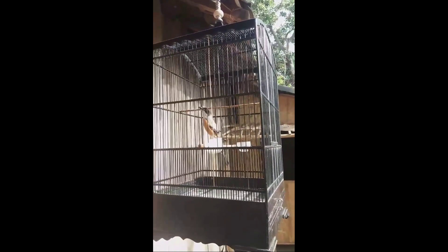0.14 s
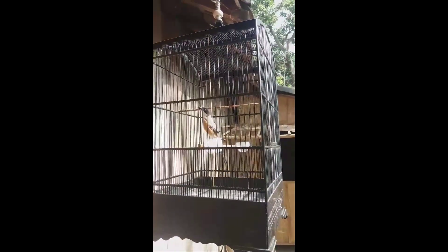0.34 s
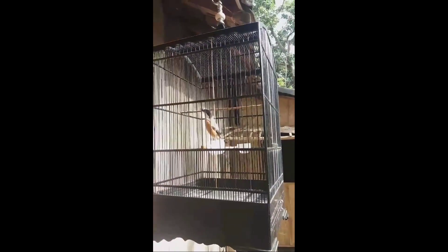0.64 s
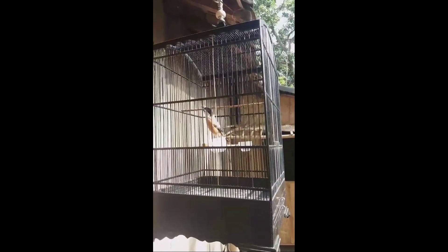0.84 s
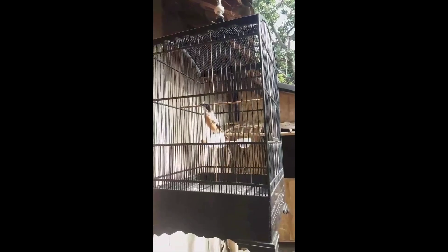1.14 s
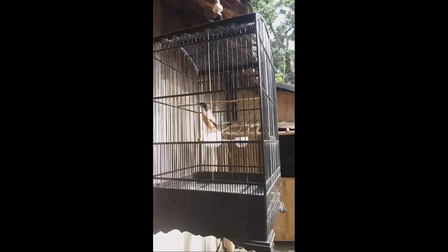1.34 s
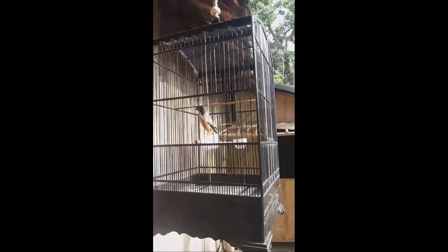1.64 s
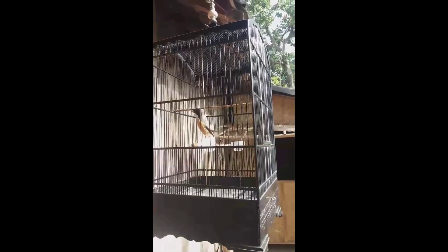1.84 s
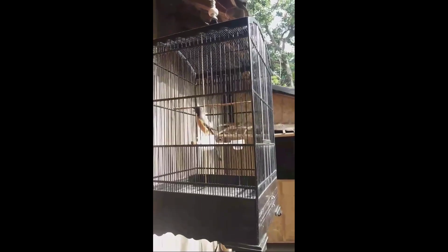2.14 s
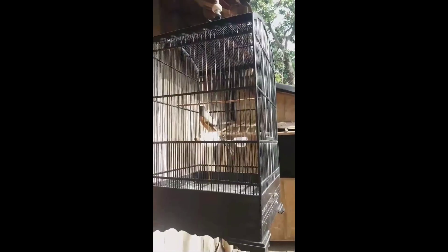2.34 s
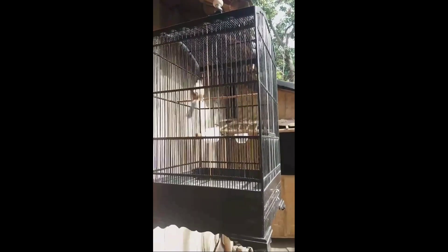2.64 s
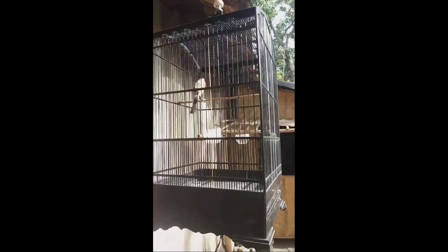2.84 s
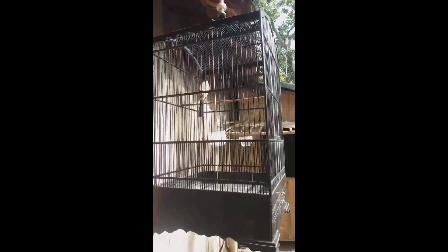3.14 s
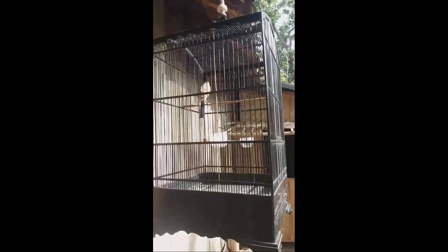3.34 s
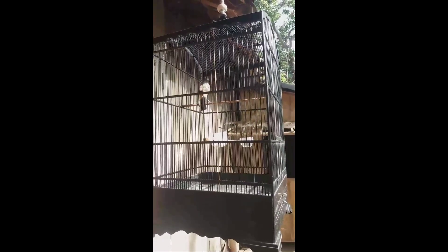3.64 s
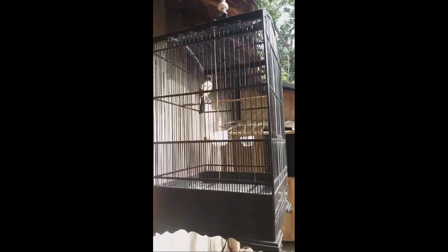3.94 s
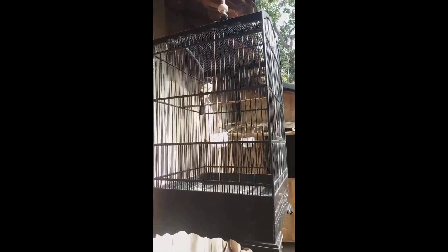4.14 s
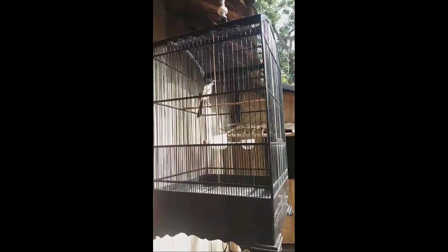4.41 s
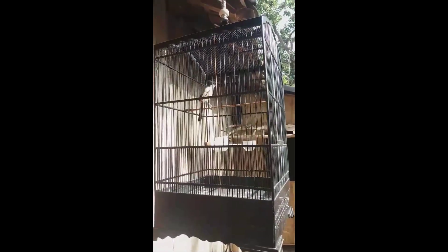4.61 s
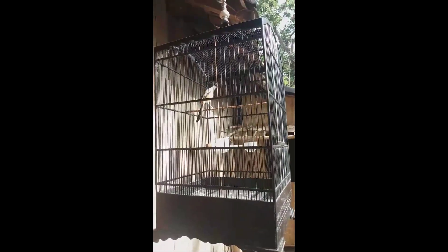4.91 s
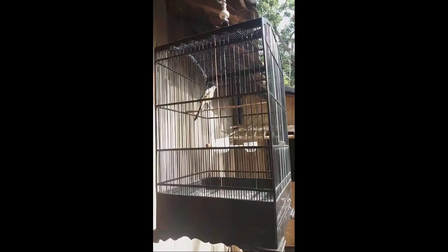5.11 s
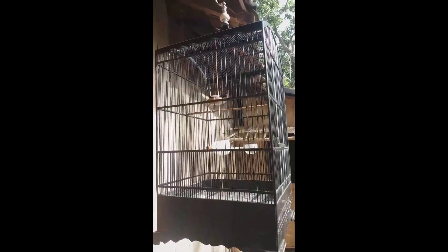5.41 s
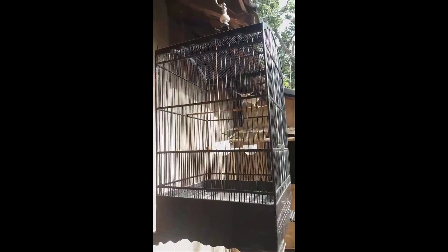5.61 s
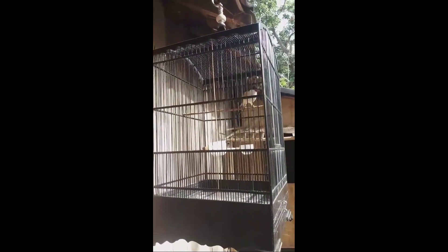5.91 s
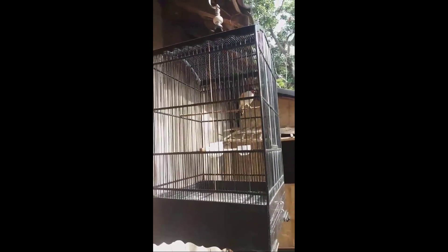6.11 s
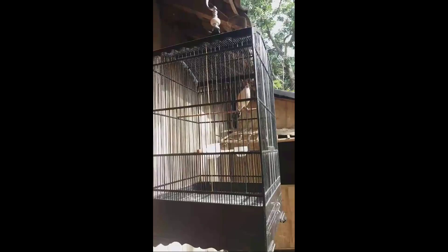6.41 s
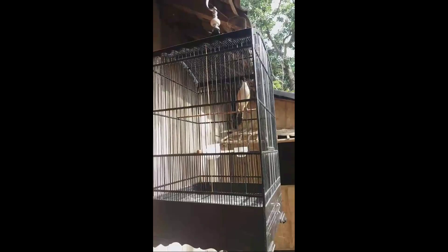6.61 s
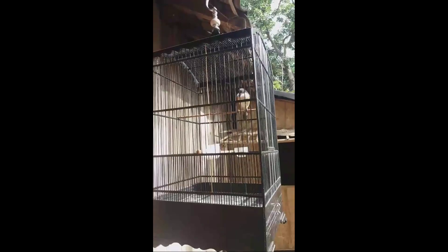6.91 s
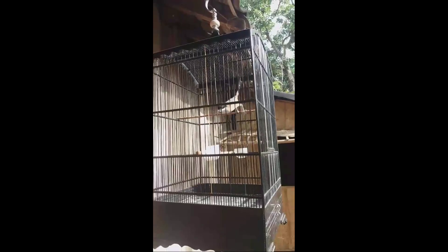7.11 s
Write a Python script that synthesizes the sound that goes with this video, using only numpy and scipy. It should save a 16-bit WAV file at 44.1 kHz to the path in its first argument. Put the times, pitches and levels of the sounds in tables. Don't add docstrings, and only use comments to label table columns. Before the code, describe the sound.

A caged bird calls loudly and close under a porch roof. Four separate harsh rasps come first, then eight evenly spaced, bright two-part chirps. Two short rasps tip into a long, rapid, hoarse chatter that gradually softens, ending in a quick sweep and three whistles that snap upward. Short yard echoes follow each call. Low traffic rumble, faint engines, a far rooster and small perch thuds lie behind, heard on a phone with slightly grainy treble.

```python
import sys
import numpy as np
from scipy import signal
from scipy.fft import rfft, irfft, next_fast_len
from scipy.io import wavfile
from scipy.ndimage import uniform_filter1d, map_coordinates

SR = 44100
rng = np.random.default_rng(int(sys.argv[2]) if len(sys.argv) > 2 else 0)


def bounce(signal):
    frames = np.transpose(np.atleast_2d(signal))
    limited = np.clip(frames, -1, 1)
    pcm = np.round(limited * 32767).astype(np.int16)
    wavfile.write(sys.argv[1], SR, pcm)


def boost(x):
    u = np.asarray(x, float) / 20
    return 10 ** u


N = 320166

# frequency in Hz, level in dB per Hz.
BEAK_OPEN = [(530, -69), (900, -27.5), (1260, -26), (1420, -23.5), (2000, -22), (2890, -8), (4100, 1.5),
             (6120, -16.5), (8150, -22), (8650, -39.5), (9510, -25), (11900, -20.5), (15500, -75)]
# frequency in Hz, gain in dB.
WINDPIPE = [(900, -27.5), (1400, -8), (1900, -1), (20000, 2.5)]
# frequency in Hz, level in dB per Hz.
CHATTER_HISS = [(530, -53.5), (900, -29), (1380, -20), (1840, -9), (2310, -24), (3630, 2.5), (4080, -16),
                (5440, -4.5), (7860, -17), (12800, -12), (15500, -21)]
# start in seconds, level in dB, pitch in Hz, halfway lines in dB.
HOARSE_NOTES = [
    (3.756, -17.5, 1966, -20),
    (3.809, -22, 1658, -6),
    (3.859, -20.5, 1737, -10),
    (3.918, -19.5, 1835, -16.5),
]


def unit(x):
    return x / np.sqrt(np.mean(x ** 2) + 1e-20)


def along(points, hz):
    f, v = np.transpose(points)
    return np.interp(np.log(hz + 1), np.log(f + 1), v)


def wobble(n, rate):
    knots = rng.standard_normal(int(n * rate / SR) + 4)
    return map_coordinates(knots, [np.arange(n) * rate / SR])


def coloured(x, spectrum):
    cep = irfft(np.log(boost(along(spectrum, np.fft.rfftfreq(2048, 1 / SR))) + 1e-6))
    cep[1:1024] *= 2
    cep[1025:] = 0
    kernel = irfft(np.exp(rfft(cep)))
    return signal.fftconvolve(x, kernel / np.linalg.norm(kernel))[:len(x)]


def note(rows):
    s, *cols = np.transpose(rows)
    t = np.arange(s[0], s[-1], 1 / SR)
    u = (t - s[0]) / (s[-1] - s[0])
    gate = np.clip(np.minimum(t - s[0], s[-1] - t) / 0.00098, 0, 1)
    return round(s[0] * SR), u, gate, [np.interp(t, s, c) for c in cols]


def add(track, at, x):
    track[at:at + len(x)] += x[:len(track) - at]


def partials(hz, levels, jitter, flutter_db, flutter_rate):
    n = len(hz)
    phase = 2 * np.pi * np.cumsum(hz * (1 + jitter * wobble(n, 497.7))) / SR
    out = np.zeros(n)
    for k, db in levels:
        flutter = flutter_db * np.clip(wobble(n, flutter_rate), -3, 1.4)
        out += np.sqrt(2) * boost(db + flutter) * np.sin(k * phase + rng.uniform(0, 6.6))
    return out


def slaps(n, rate, hiss):
    cycles = np.cumsum(rate * boost(2 * wobble(n, 300))) / SR
    when = np.diff(np.floor(cycles), prepend=0)
    sizes = boost(2.5 * rng.standard_normal(n))
    return unit(unit(when * sizes) + hiss * rng.standard_normal(n))


def yard():
    # time in seconds, rumble level in dB.
    traffic_swell = [(0.0, -57), (0.32, -56), (3.499, -50.5), (3.54, -57.5), (4.2, -51), (4.25, -54),
                     (4.55, -44.5), (4.65, -51), (7.26, -53.5)]
    # frequency in Hz, level in dB per Hz.
    rumble_colour = [(12, -30), (20, -20.5), (27, -38), (57, -0.5), (107, 2.5), (126, 2), (156, -7),
                     (196, -9.5), (400, -27.5), (520, -67), (880, -120)]
    hush_colour = [(120, -45), (200, -2), (488, -4.5), (728, -2), (1050, -5.5), (1650, -4.5), (2130, -9),
                   (4500, -15), (7900, -26.5), (14200, -18), (15500, -45.5)]
    hz = np.fft.rfftfreq(N, 1 / SR)
    noise = rfft(rng.standard_normal((2, N)))
    road = unit(irfft(noise[0] * boost(along(rumble_colour, hz)), N))
    hush = unit(irfft(noise[1] * boost(along(hush_colour, hz)), N))
    s, db = np.transpose(traffic_swell)
    traffic_db = np.interp(np.arange(N) / SR, s, db)
    road_level = boost(traffic_db + 1.4 * wobble(N, 3.83))
    hush_level = boost(0.31 * traffic_db - 39 + 0.37 * wobble(N, 0.92))
    return road_level * road + hush_level * hush


def passers():
    # closest moment in seconds, half width in seconds, level in dB, centre in Hz.
    engines = [
        (3.15, 0.24, -55.5, 1360),
        (4.15, 0.32, -57, 766),
    ]
    hz, t = np.fft.rfftfreq(N, 1 / SR), np.arange(N) / SR
    out = np.zeros(N)
    for s, wide, db, centre_hz in engines:
        band = np.exp(-(np.log((hz + 1) / centre_hz) / 0.45) ** 2)
        haze = unit(irfft(rfft(rng.standard_normal(N)) * band, N))
        out += boost(db + 2.1 * wobble(N, 26.0)) * np.exp(-((t - s) / wide) ** 2) * haze
    return out


def roosters():
    # start in seconds, length in seconds, pitch in Hz, first and second partial in dB.
    syllables = [(.2, 0.2, 867, -56, -70), (.33, 0.34, 844, -66, -51.5), (0.984, 0.23, 959, -54.5, -76),
                 (1.12, 0.18, 740, -71, -51.5), (1.327, 0.69, 811, -55, -51),
                 (2.122, 0.19, 803, -73.5, -44.5)]
    last_syllables = [
        (2.112, 0.2, 689, -64, -43.5),
        (3.079, 0.16, 732, -80, -52),
    ]
    attack_s, release_s, edge_db = 0.027, 0.1, -11.5
    crows = [(row, 0.11) for row in syllables] + [(row, 0.45) for row in last_syllables]
    out = np.zeros(N)
    for (s, life, hz, one, two), sag in crows:
        release_at = max(life - release_s, attack_s)
        shape = [(0, edge_db), (attack_s, 0), (release_at, 0), (life, edge_db)]
        at, u, gate, (db,) = note([(s + late, soft) for late, soft in shape])
        pitch = hz * (1 - sag * life * u)
        levels = [(1, one + db), (2, two + db)]
        add(out, at, gate * partials(pitch, levels, jitter=.02, flutter_db=3.5, flutter_rate=45.))
    return out


def perch():
    # time in seconds, peak in dB, lowest mode in Hz.
    hops = [
        (1.841, -35, 60.4),
        (4.521, -42, 90),
        (5.789, -37, 329.3),
        (7.169, -32.5, 340),
    ]
    out, t = np.zeros(N), np.arange(3000) / SR
    for s, db, hz in hops:
        ring = sum(share * np.sin(2 * np.pi * ratio * hz * t) for ratio, share in [(1, 1), (2.47, .51), (1.59, .5)])
        add(out, round(s * SR), boost(db - 60 * t / 0.03) * (1 - np.exp(-t / 0.00223)) * ring)
    return out


def walls(x, count):
    # frequency in Hz, 60 dB decay time in seconds.
    decay_times = [(1000, 0.84), (2300, 0.25), (3400, 0.3), (4400, 0.3), (5600, 0.38), (7000, 0.35),
                   (12000, 0.22)]
    hz, t, z = signal.stft(rng.standard_normal((count, int(.7 * SR))), SR, nperseg=256)
    z *= boost(2.7 * np.exp(-((hz[:, None] - 4350) / 450) ** 2))
    tails = signal.istft(z * boost(-60 * t / along(decay_times, hz)[:, None]), SR, nperseg=256)[1]
    tails[:, :900] *= 1 + 0.5 * np.linspace(1, 0, 900)
    lumps = boost(5 * wobble(tails.size, 120))
    tails *= lumps.reshape(tails.shape)
    turn = np.arange(N) / SR / 0.28 % count
    away = np.abs((turn - np.arange(count)[:, None] + count / 2) % count - count / 2)
    share = np.clip(1 - away, 0, 1)
    tails = tails / np.linalg.norm(tails, axis=1, keepdims=True)
    wet = signal.fftconvolve(x * share, tails, axes=1)
    return np.pad(wet.sum(0), (130, 0))[:N]


def rasps():
    # start in seconds, length in seconds, peak in dB.
    harsh_calls = [
        (.082, 0.11, -14),
        (.63, 0.1006, -11.5),
        (1.04, 0.09, -12.5),
        (1.409, 0.1, -12.5),
        (3.736, 0.069, -16.5),
        (3.8, 0.069, -23),
    ]
    # share of the length, level in dB.
    call_swell = [(0, -34), (.2, -8.5), (.55, -2), (.85, -7.5), (1, -20.5)]
    # start in Hz, top in Hz, share of the length climbing, level in dB.
    hoarse_cores = [
        (2500, 4350, .8, -5.5),
        (2500, 4300, .85, -7.5),
        (2670, 3400, 0.5, -7.5),
        (2387, 4200, 0.55, -8.5),
    ]
    # frequency in Hz, level in dB per Hz.
    beak_shut = [(530, -87), (900, -44.5), (1290, -32), (1420, -17.5), (1540, -20), (1820, -12),
                 (2200, -9.5), (3540, -4.5), (4390, -22.5), (7230, -45), (8650, -53.5), (11400, -48.5),
                 (15500, -40.5)]
    shut, wide, core = np.zeros((3, N))
    for k, (s, life, peak_db) in enumerate(harsh_calls):
        at, u, gate, (db,) = note([(s + share * life, peak_db + soft) for share, soft in call_swell])
        alone = s < HOARSE_NOTES[0][0] - life
        x = gate * boost(db - 3 - 1 * (not alone)) * slaps(len(u), rate=600., hiss=1.1)
        opening = np.clip(1.04 * u - .1, 0, 1) if alone else 0.51 + 0 * u
        add(shut, at, x * np.cos(np.pi / 2 * opening))
        add(wide, at, x * np.sin(np.pi / 2 * opening))
        if alone:
            low, top, climb, core_db = hoarse_cores[k]
            hz = low + (top - low) * np.sin(np.pi / 2 * np.clip(u / climb, 0, 1))
            levels = [(1, db + core_db)]
            add(core, at, gate * partials(hz, levels, jitter=0.0816, flutter_db=1.5, flutter_rate=430.0))
    return coloured(shut, beak_shut) + coloured(wide, BEAK_OPEN) + core


def leads():
    # time in seconds, pitch in Hz, level in dB.
    lead_paths = [
        [(1.633, 3380, -38), (1.638, 3896, -40.5), (1.643, 3512, -19.5), (1.652, 3650, -22), (1.659, 3291, -21),
         (1.664, 2577, -24.5), (1.673, 2450, -23.5)],
        [(1.847, 3346, -43), (1.856, 3808, -24), (1.860, 3620, -17.5), (1.869, 3370, -20), (1.875, 2703, -23),
         (1.883, 2390, -18.5)],
        [(2.084, 3310, -43), (2.094, 3866, -41), (2.096, 3510, -20.5), (2.103, 3400, -16), (2.108, 2750, -22),
         (2.12, 2470, -16)],
        [(2.353, 1990, -39.5), (2.36, 2850, -21), (2.365, 3160, -14.5), (2.371, 2655, -21), (2.378, 2685, -15),
         (2.389, 2390, -29)],
        [(2.574, 2580, -32.5), (2.581, 3400, -16.5), (2.59, 3330, -22), (2.596, 2800, -20), (2.605, 2430, -27)],
        [(2.805, 2587, -34), (2.81, 2883, -30.5), (2.812, 3520, -20), (2.82, 3200, -16.5), (2.828, 2769, -20.5),
         (2.839, 2584, -27.5)],
        [(3.03, 3890, -42.5), (3.04, 3809, -20), (3.047, 3480, -22), (3.053, 2930, -26), (3.06, 2500, -27)],
        [(3.288, 2090, -34.5), (3.293, 3030, -21), (3.297, 3080, -16.5), (3.31, 2925, -21.5),
         (3.316, 2487, -26)],
    ]
    # start in seconds, length in seconds, pitch in Hz, level in dB.
    second_voice = [
        (1.652, 0.048, 3650, -23),
        (1.865, 0.033, 3489, -22.5),
        (2.102, 0.034, 3445, -21.5),
        (2.367, 0.034, 3510, -23),
        (2.589, 0.03, 3394, -22.5),
        (2.821, .027, 3380, -22),
        (3.045, 0.035, 3520, -23.5),
        (3.298, 0.036, 3690, -25.5),
    ]
    # share of the length, level in dB.
    stutter_shape = [(0, -5.5), (.25, 0), (.55, -1), (1, -20)]
    tone, rough = np.zeros((2, N))
    for path, (s, life, high_hz, high_db) in zip(lead_paths, second_voice):
        at, u, gate, (hz, db) = note(path)
        whistle = partials(hz, [(1, db)], jitter=.016 + .035 * u, flutter_db=1.5 + 3 * u, flutter_rate=330.)
        add(tone, at, gate * whistle)
        at, u, gate, (db,) = note([(s + share * life, high_db + soft) for share, soft in stutter_shape])
        stutter = partials(high_hz + 0 * u, [(1, db)], jitter=.05, flutter_db=6., flutter_rate=520.)
        add(tone, at, gate * stutter)
        add(rough, at, gate * boost(db - 7.5) * slaps(len(u), rate=190.0, hiss=1.5))
    return coloured(tone, WINDPIPE) + coloured(rough, BEAK_OPEN)


def chirps():
    # time in seconds, frequency in Hz, level in dB.
    held_paths = [
        [(1.672, 4880, -18.5), (1.68, 4620, -18.5), (1.702, 4390, -13.5), (1.726, 4524, -31),
         (1.735, 4620, -47.5)],
        [(1.882, 4580, -18.5), (1.892, 4353, -14.5), (1.916, 4454, -15.5), (1.924, 4350, -20),
         (1.945, 4470, -39)],
        [(2.119, 4940, -24), (2.127, 4440, -16.5), (2.141, 4474, -12.5), (2.167, 4275, -25.5),
         (2.176, 4390, -36.5)],
        [(2.388, 4820, -20), (2.396, 4550, -18), (2.426, 4616, -13.5), (2.448, 4500, -42)],
        [(2.604, 4830, -38), (2.608, 4832, -23.5), (2.614, 4600, -19), (2.62, 4631, -28), (2.644, 4467, -20.5),
         (2.656, 4555, -33.5), (2.666, 4480, -20)],
        [(2.838, 4850, -25), (2.848, 4610, -14.5), (2.856, 4490, -16.5), (2.88, 4680, -15.5),
         (2.898, 4700, -35)],
        [(3.059, 4900, -33), (3.065, 4940, -19.5), (3.073, 4420, -16), (3.079, 4493, -12.5),
         (3.111, 4420, -21.5), (3.122, 4340, -32.5)],
        [(3.315, 4860, -31.5), (3.325, 4754, -22), (3.333, 4466, -15), (3.347, 4475, -15.5), (3.367, 4444, -19),
         (3.378, 4460, -38.5)],
    ]
    # first, third and fourth partial in dB.
    held_levels = [(-26.5, -32, -35.5), (-26.5, -34.5, -35), (-25.5, -37, -41.5), (-24.5, -34.5, -46),
                   (-26, -28, -41), (-23, -32.5, -34.5), (-24.5, -32.5, -32.5), (-24, -33.5, -28.5)]
    # share of the length, first and third partial in dB.
    hold_shape = [(0, 5, -29.5), (.2, 0, -7.5), (.45, -0.5, -1.5), (.72, -4.5, -1), (1, -13, -29.5)]
    tone, rough = np.zeros((2, N))
    share, first, upper = np.transpose(hold_shape)
    for path, (first_db, third_db, fourth_db) in zip(held_paths, held_levels):
        at, u, gate, (hz, two) = note(path)
        one = first_db + np.interp(u, share, first)
        two = two + 2
        upper_db = np.interp(u, share, upper)
        three = third_db + upper_db
        levels = [(1, one), (2, two), (3, three), (4, fourth_db + upper_db), (5, three - 14), (6, three - 20)]
        held = partials(hz / 2, levels, jitter=.006, flutter_db=1.2 + 1.5 * u, flutter_rate=200.)
        add(tone, at, gate * held)
        add(rough, at, gate * boost(two - 24) * slaps(len(u), rate=900., hiss=2.5))
    return coloured(tone, WINDPIPE) + coloured(rough, BEAK_OPEN)


def chatter():
    # start in seconds, level in dB, pitch in Hz, halfway lines in dB.
    full_flow = [(3.985, -17.5, 1896, -6), (4.056, -15, 1908, -10), (4.124, -18.5, 1923, -9.5),
                 (4.195, -17.5, 1889, -7.5), (4.265, -18.5, 1867, -11), (4.339, -18, 1842, -5.5),
                 (4.412, -19, 1867, -7.5), (4.487, -18, 1865, -4), (4.56, -18.5, 1837, -5.5),
                 (4.635, -18, 1855, -6.5), (4.711, -18, 1797, -10), (4.786, -15.5, 1809, -9),
                 (4.855, -18.5, 1797, -7), (4.93, -18, 1821, -12.5), (5.002, -18, 1850, -4),
                 (5.078, -17.5, 1878, -4), (5.154, -17.5, 1847, -6.5), (5.228, -17, 1763, -18),
                 (5.302, -18, 1835, -5.5), (5.374, -19.5, 1810, -15), (5.45, -18.5, 1780, -19),
                 (5.52, -18.5, 1805, -12), (5.596, -20, 1748, -40), (5.668, -19, 1818, -7.5)]
    tiring = [(5.743, -20, 1847, -8.5), (5.813, -19.5, 1845, -17), (5.886, -19, 1878, -33),
              (5.961, -19, 1900, -11), (6.036, -21, 1974, -12), (6.107, -22, 1800, -16),
              (6.181, -21.5, 1893, -14), (6.26, -20.5, 1925, -29), (6.336, -19.5, 1847, -13.5),
              (6.411, -21.5, 1762, -35), (6.488, -22, 1780, -22)]
    closing_notes = [
        (6.566, -21.5, 2001, -15),
        (6.646, -20.5, 2180, -27),
        (6.736, -20, 2242, -14),
    ]
    # time in seconds, pitch share, level in dB.
    arch = [(0, 0.8, -2), (.005, 0.93, -1.5), (0.018, 1, -1), (0.04, 0.88, -7.5)]
    climb = [(0, 0.64, -12), (.008, .83, 1), (0.025, .97, -1), (0.039, 0.97, -6)]
    # time in seconds, level in dB.
    beak_width = [(3.76, -48), (3.82, -6.5), (3.87, -1.5), (3.94, -11), (3.98, -9), (4.06, -14.5),
                  (4.2, -10), (4.34, -5.5), (4.75, -1), (5.08, -4), (5.62, 1.5), (5.9, -5.5), (6.2, -10),
                  (6.42, -7.5), (6.6, -6.5), (6.76, -20)]
    # how much louder its second half in dB, length share.
    pushes = [(0, 0.93), (-4, 1.0), (3, 0.98), (2, 0.89), (2, 1.0), (-2.5, 1), (3, 0.9), (0, 1.0),
              (-1, 1.0), (0.5, 0.92), (0.5, 0.97), (-2, 0.843), (4.5, 0.84), (-4.5, 1.0), (1.5, 0.802),
              (-0.5, 0.8), (1.5, 0.837), (-5, 1), (3, 0.89), (3.5, 0.97), (-2, 1.0), (-2, 1.0), (1.5, 0.76),
              (2, 0.795), (2.5, 0.847), (1, 0.99), (-3, 0.945), (-1.5, 0.92), (1.5, 0.934), (2.5, 0.96),
              (1.5, 0.86), (0.5, 0.94), (-5, 0.94), (1.5, 0.96), (1.5, 1.0)]
    # climb in seconds, starting pitch share, hiss in dB, lowest halfway line in dB.
    glides = [(0.018, 0.93, 2.5, 2), (0.017, 0.58, 0, 2), (0.022, 0.88, 2.5, -2), (0.0177, 0.7, 1, -1),
              (0.024, 0.63, -3.5, -1), (0.013, 0.59, -1, -7), (0.0181, 0.65, 1, -5), (0.014, 1, -2.5, -4),
              (0.0148, 0.6, -1, -6), (0.019, 0.57, -2, -1.5), (0.013, 0.76, -0.5, -2),
              (0.016, 0.57, -2.5, 0), (0.028, 0.7, -1.5, -5), (0.0226, 0.82, 0.5, 6), (0.012, 0.7, -1.5, 1),
              (0.016, 0.56, -2, -0.5), (0.0153, 0.76, -4, 0), (0.0154, 0.68, -1.5, -1.5),
              (0.016, 0.79, -0.5, -0.5), (0.026, 0.76, -1, 3), (0.016, 0.48, -2, 1.5), (0.021, 0.7, 1.5, 2),
              (0.018, 0.62, 1.5, 0), (0.021, 0.56, 3, 0), (0.008, 0.76, 2, 4.5), (0.00634, 0.51, -2.5, 6),
              (0.004, 0.7, -1, 0), (0.016, 0.7, 3.5, 4), (0.024, 0.42, 3.5, -3), (0.029, 0.7, 1.5, 0),
              (0.022, 0.7, -1.5, 6), (0.022, 0.88, 1.5, 0), (0.0184, 0.7, -0.5, 0.5), (0.02, 0.39, 1, 0),
              (0.015, 0.5, 1, 6)]
    shines = [1, 0.5, -0.5, -1, 1, -2, -4, -3, -4, 1, 0, 0, -3, -1, -2.5, -1.5, -3, -2, 0, -1.5, 0, 5.5, 7,
              2.5, -6, -3, -2, 2, 0, 2, -2, -6, -4, 4, 1.5]
    scoop = [(-.002, 0.758, -17), (.001, .81, -6), (.005, .92, -5), (.009, 1, -0.5)]  # (s, pitch share, dB)

    def beak(s):
        return np.interp(s, *np.transpose(beak_width))

    notes = [(row, arch, None) for row in HOARSE_NOTES]
    for row, (late_db, share), glide, shine_db in zip(full_flow + tiring, pushes, glides, shines):
        life = 0.03 - .0003 * beak(row[0])
        push = [(0.81 * share * life, 1.015, -2.0 + late_db), (share * life + 0.00668, .995, -15)]
        notes.append((row, scoop + push, (*glide, shine_db)))
    notes += [(row, climb, None) for row in closing_notes]

    tone, rough = np.zeros((2, N))
    for (s, level_db, pitch, half), shape, glide in notes:
        hoarse = shape is arch
        at, u, gate, (hz, db) = note([(s + late, share * pitch, level_db + soft) for late, share, soft in shape])
        third = beak(s)
        climb_s, start, hiss_db, low_db, shine_db = glide or (1, 1, 0, 0, 0)
        if glide:
            left = (1 - np.clip(np.arange(len(u)) / SR / climb_s, 0, 1)) ** 2.81
            hz = pitch * (1 - (1 - start) * left - 0.012 * u ** 3)
            half = half - 9 * left
        db = db - 10 * np.log10(1 + boost(third) ** 2 + 2 * boost(half) ** 2)
        first_db = db - 10.0 - 6 * hoarse - 30 * (1 - hz / hz.max())
        bright = db + third / 2 + shine_db
        levels = [(1, first_db), (1.5, db + half - 4.5 + low_db), (2, db), (2.5, db + half + 1.0),
                  (3, db + third), (3.5, db + half - 8), (4, db + third - 9.5 + shine_db),
                  (5, bright - 13.0), (6, bright - 25), (7, bright - 25.0)]
        jitter = rng.uniform(.011, .022) + .022 * u + .025 * hoarse
        add(tone, at, gate * partials(hz, levels, jitter, flutter_db=2.8 + 2 * u, flutter_rate=260.))
        fade = 1.2 - .2 * u if hoarse else 1.15 - .6 * u
        wide_db = third / 1.5 - 1 if hoarse else third / 3 - 2.5
        add(rough, at, gate * fade * boost(db + hiss_db + wide_db) * slaps(len(u), rate=900., hiss=1.5))
    return coloured(tone, WINDPIPE) + coloured(rough, CHATTER_HISS)


def whistles():
    # time in seconds, pitch in Hz, partials 1, 2 and 3 in dB, rasp in dB.
    sweep = [(6.826, 1876, -42, -44, -47.5, -36), (6.836, 2605, -22, -38, -55, -26),
             (6.844, 3050, -21, -39.5, -59, -29), (6.856, 3016, -20.5, -36, -60, -33),
             (6.866, 2890, -39, -43.5, -63, -40)]
    # step in seconds, low pitch in Hz, high pitch in Hz, level in dB, third partial in dB.
    steps = [
        (6.942, 2570, 3285, -21.5, -33),
        (7.056, 2500, 3251, -19.5, -24.5),
        (7.174, 2556, 3577, -19, -21),
    ]
    step_starts = [-0.19, .2, .2]
    # seconds from the step, share of the step, partials 1, 2 and 3 in dB, rasp in dB.
    step_shape = [(-.023, 0.2, -8, -17, -19.5, -39), (-.007, 0.012, -3, -7.5, 2, -39),
                  (-.0035, 0.24, -3, -6, -13, -26), (-.001, 0.956, -2, 1, -2.5, -7),
                  (.008, 1.0, -7.5, -4, -12, -6), (0.021, 0.85, -42, -19, -37, -34)]
    calls = [sweep]
    for (s, low, high, db, third), start in zip(steps, step_starts):
        rows = []
        for late, way, one, two, three, rasp in step_shape:
            way = way if late > step_shape[0][0] else start
            rows.append((s + late, low + way * (high - low), db + one, db + two, third + three, db + rasp))
        calls.append(rows)

    tone, rough = np.zeros((2, N))
    for rows in calls:
        stepped = rows is not sweep
        at, u, gate, (hz, one, two, three, rasp) = note(rows)
        levels = [(1, one), (2, two), (3, three), (4, three - 6), (5, three - 9), (5.8, three - 10)]
        clear = partials(hz, levels, jitter=0.012 + 0.02 * u, flutter_db=1.6 + 2 * u, flutter_rate=300.)
        add(tone, at, gate * clear)
        hoarse = [(1.5, rasp - 25 * stepped), (1.75, rasp - 3), (2, rasp - 3)]
        add(tone, at, gate * partials(hz, hoarse, jitter=.07, flutter_db=4., flutter_rate=500.))
        add(rough, at, gate * boost(rasp - 3.5 - 11.8 * stepped) * slaps(len(u), rate=1400.0, hiss=3.3))
    return coloured(tone, WINDPIPE) + coloured(rough, CHATTER_HISS)


def scene():
    far = roosters()
    bird = rasps() + leads() + chirps() + chatter() + whistles()
    echo = boost(-9.5) * walls(bird + far, count=4)
    return (yard() + passers() + 0.58 * far + perch() + echo + bird)[None]


def low_pass(x):
    return signal.sosfilt(signal.butter(12, 15760, fs=SR, output="sos"), x)


def record(dry):
    # frequency in Hz, gain in dB.
    seam_dips = [(7000, -0.5), (7700, -10), (8200, -0.5), (8500, -15), (8900, -3), (14800, -3),
                 (15500, -11), (15750, -54)]
    shift_hz, seam_hz = 7500, 8300
    analytic = signal.hilbert(dry[0], next_fast_len(N))[:N]
    lifted = np.real(analytic * np.exp(2j * np.pi * shift_hz * np.arange(N) / SR))
    layers = np.array([dry[0], lifted, rng.standard_normal(N)])
    hz, _, (low, high, fill) = signal.stft(layers, SR, nperseg=256)

    def coarse(z):
        smooth = uniform_filter1d(np.abs(z) ** 2, size=6, axis=0)
        return np.abs(uniform_filter1d(smooth, size=3, axis=1)) + 1e-16

    outline = coarse(high)
    humps = (outline / outline[hz > seam_hz].mean(0)) ** 0.143
    detail = 0.77 * humps * high / np.sqrt(outline) + 0.5 * fill / np.sqrt(coarse(fill))
    rebuilt = np.where(hz[:, None] < seam_hz, low, detail * np.sqrt(coarse(low)))
    mixed = boost(along(seam_dips, hz))[:, None] * rebuilt
    return low_pass(signal.istft(mixed, SR, nperseg=256)[1][None, :N])


dry = scene()
out = record(dry)
bounce(out)
```